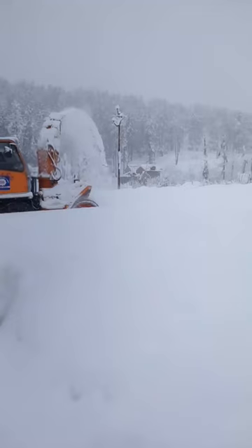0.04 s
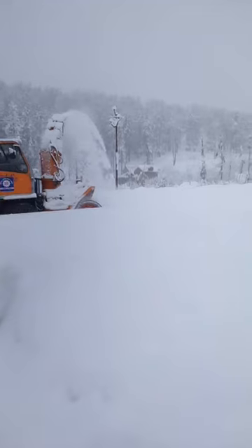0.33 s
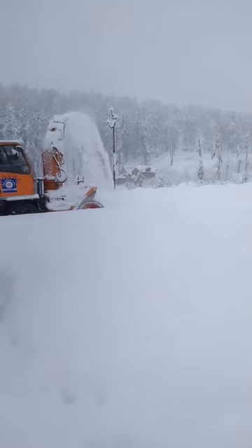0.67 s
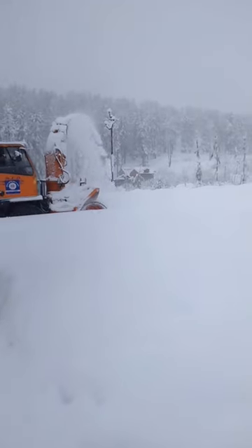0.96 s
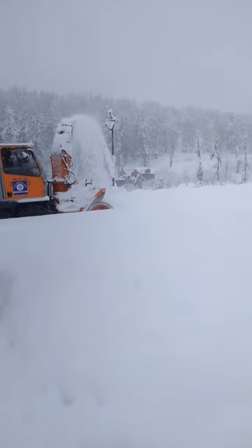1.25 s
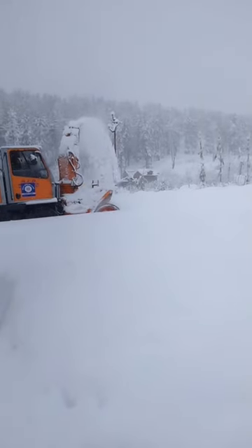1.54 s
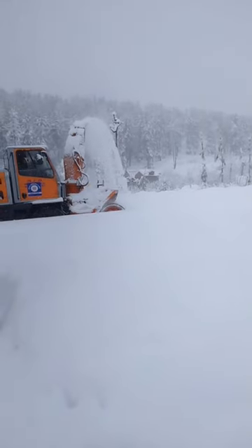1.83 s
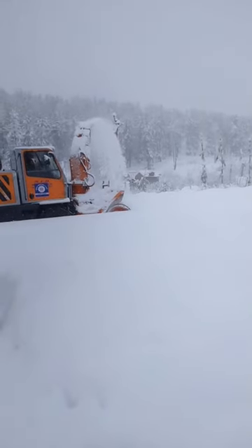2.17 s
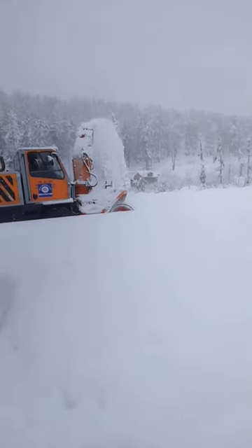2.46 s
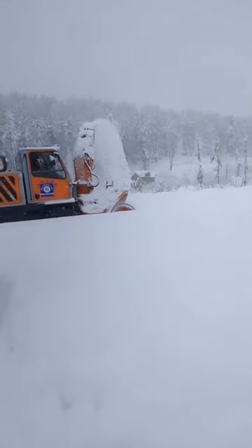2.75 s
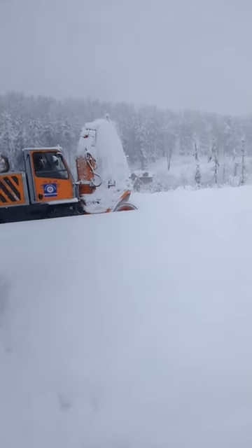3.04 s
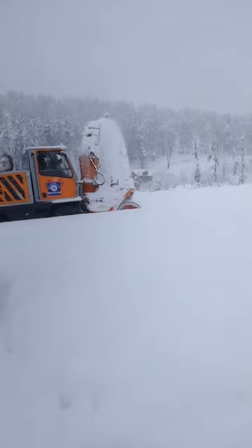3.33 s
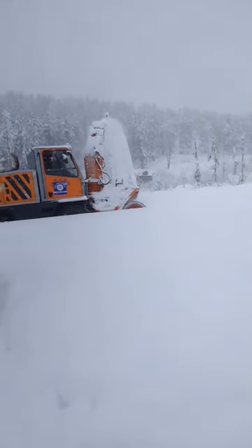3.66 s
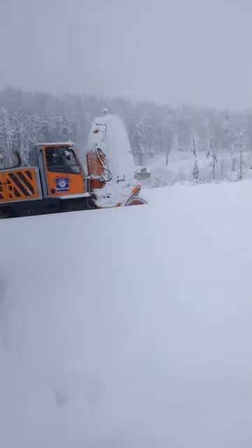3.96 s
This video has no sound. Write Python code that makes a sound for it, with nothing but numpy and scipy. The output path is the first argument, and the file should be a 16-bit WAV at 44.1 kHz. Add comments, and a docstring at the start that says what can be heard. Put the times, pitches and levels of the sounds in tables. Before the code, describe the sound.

Steady roar of a diesel snow blower, with gear whine, rattle and snow hiss.

```python
"""An open field, with a rotary snow blower working across it, its six-cylinder diesel at full speed.
The exhaust hums, the block knocks at each firing, and the drive gears whine and rattle as the load
comes and goes. The rotor roars, the casing drones and sheet-metal panels sing, while snow hisses
up the chute and out in a jet. One brief high fizz comes halfway through."""
import sys
import numpy as np
from scipy import signal
from scipy.fft import rfft, irfft
from scipy.io import wavfile
from scipy.ndimage import map_coordinates

SR = 44100
rng = np.random.default_rng(int(sys.argv[2]) if len(sys.argv) > 2 else 0)


def to_wav(sig):
    """Store sig (one row per channel, or 1-D mono) as 16-bit WAV at the path in sys.argv[1].

    Samples outside -1..1 are clipped; the rate is SR.
    """
    pcm = np.clip(np.atleast_2d(sig), -1, 1) * 32767
    pcm = np.round(pcm).astype(np.int16)
    wavfile.write(sys.argv[1], SR, pcm.T)  # frames by channels


N = 176400
T = np.arange(N) / SR
BIN_HZ = np.fft.rfftfreq(N, 1 / SR)
CYLINDERS = 6


def amp(db):
    """Decibels to gain."""
    return 10 ** (np.asarray(db) / 20)


def unit(x):
    """Scales to rms 1."""
    return x / np.sqrt(np.mean(x ** 2) + 1e-20)


def curve(points):
    """An automation lane: straight lines between (seconds, value) points."""
    return np.interp(T, *np.transpose(points))


def colour(x, spectrum):
    """Shapes a sound with an EQ curve of (Hz, dB) points, then scales it to rms 1."""
    hz, db = np.transpose(spectrum)
    eq_db = np.interp(np.log(BIN_HZ + 1), np.log(hz), db, left=-70, right=-70)
    return unit(irfft(rfft(x) * amp(eq_db), N))


def wander(rate_hz):
    """Random drift up to about the given rate, rms 1."""
    lowpass = (BIN_HZ > 0) / (1 + (BIN_HZ / rate_hz) ** 4)
    return unit(irfft(rfft(rng.standard_normal(N)) * lowpass, N))


def tone(turns):
    """A sine that follows a count of turns, rms 1."""
    return np.sqrt(2) * np.sin(2 * np.pi * (turns + rng.random()))


def clatter(cycles, pulse, repeat, size=3300):
    """Noise that swells at each firing; the share `repeat` comes back alike in every engine cycle."""
    one_cycle = irfft(np.exp(2j * np.pi * rng.random(size // 2 + 1)), size)
    loop = map_coordinates(one_cycle, [cycles % 1 * size], order=3, mode="grid-wrap")
    noise = np.sqrt(repeat) * unit(loop) + np.sqrt(1 - repeat) * rng.standard_normal(N)
    firings = cycles * CYLINDERS
    uneven = rng.standard_normal(CYLINDERS)  # some cylinders fire harder than others
    force = 1 + 0.18 * unit(uneven - uneven.mean())[firings.astype(int) % CYLINDERS]
    return noise * np.exp(pulse * force * (1 - np.cos(2 * np.pi * firings)))


# The engine's hum. Each row: harmonic of the two-turn engine cycle, level in dB.
EXHAUST_HARMONICS = [(6, -52.5), (12, -45), (18, -46.5), (21, -58), (22, -57), (24, -59.5), (30, -60.5),
                     (55, -55.5), (60, -56.5), (72, -57), (75, -51.5), (84, -49)]

def exhaust(cycles):
    """Exhaust and block hum in tones locked to the engine, each wavering in level."""
    return sum(amp(db) * tone(harmonic * cycles) * (1 + 0.12 * wander(5))
               for harmonic, db in EXHAUST_HARMONICS)


# The low end. Each row: pitch in Hz, level in dB.
ROTOR_AND_FAN = [(22.4, -72.5), (56, -67)]

def rotor_hum():
    """The slow-turning rotor and cooling fan lay down a faint, steady hum."""
    return sum(amp(db) * tone(hz * T) for hz, db in ROTOR_AND_FAN)


# The whine riding the load. Each row: time in seconds, level in dB before trim.
WHINE_LEVELS = [(0.1, -47), (0.3, -38), (0.45, -40), (0.7, -40.5), (0.81, -48), (0.97, -37.5), (1.1, -37.5),
                (1.15, -30), (1.45, -32.5), (1.6, -30), (1.83, -33), (2.22, -38), (2.32, -48),
                (2.45, -39.5), (2.62, -37), (2.73, -30.5), (3.06, -30.5), (3.13, -40.5), (3.18, -30),
                (3.4, -28), (3.5, -37), (3.57, -34), (3.62, -51)]

def gear_whine(cycles, teeth=92, trim_db=0.26):
    """Meshing teeth whine, with a wobble on each shaft turn and a random flutter."""
    shaft_turns = 2 * cycles
    wobble = 1 + 0.12 * tone(shaft_turns) + 0.1 * wander(30)
    return amp(curve(WHINE_LEVELS) + trim_db) * unit(wobble * tone(teeth * shaft_turns))


# The gear housing's ring. Each row: frequency in Hz, relative gain in dB.
HOUSING_EQ = [(1900, -47), (2060, -9), (2160, -0.5), (2300, -2.5), (2420, -4.5), (2500, -3.5), (2580, -22),
              (2800, -44)]
# How hard the teeth rattle. Each row: time in seconds, level in dB before trim.
RATTLE_LEVELS = [(0.12, -38), (0.43, -35), (0.52, -36.5), (1.66, -32), (2.55, -36), (2.71, -32.5),
                 (3.5, -34), (3.52, -35), (3.72, -35.5)]

def gear_rattle(cycles, trim_db=-1):
    """Gear teeth rattle with the firings and ring their housing."""
    rattle = colour(clatter(cycles, pulse=0.22, repeat=0.34), HOUSING_EQ)
    return amp(curve(RATTLE_LEVELS) + trim_db) * rattle


# The block's bright ring. Each row: frequency in Hz, relative gain in dB.
BLOCK_EQ = [(3500, -40.5), (3870, -12.5), (4090, 4), (4270, -3.5), (4500, -20), (4900, -39)]
# How hard it knocks. Each row: time in seconds, level in dB before trim and flicker.
KNOCK_LEVELS = [(0.09, -40), (0.11, -32), (0.16, -48), (0.55, -45), (0.575, -34.5), (0.62, -41), (0.8, -39),
                (0.93, -37), (1.05, -40), (1.37, -47.5), (1.75, -43.5), (2.3, -42.5), (3.1, -44.5),
                (3.72, -50)]

def knock(cycles, trim_db=-1.7):
    """Each firing rings the engine block."""
    flicker_db = 1.85 * wander(22)
    ring = colour(clatter(cycles, pulse=0.45, repeat=0.35), BLOCK_EQ)
    return amp(curve(KNOCK_LEVELS) + trim_db + flicker_db) * ring


# The body of the roar. Each row: frequency in Hz, relative gain in dB.
ROAR_EQ = [(20, -38), (45, -34.5), (90, -25), (130, -16), (185, -8.5), (235, -4), (285, -3.5), (340, -4),
           (395, -14), (440, -10), (495, -17), (555, -6.5), (615, -9.5), (680, -1.5), (745, -7.5),
           (810, -3.5), (890, -7), (990, -5.5), (1160, -8), (1205, -5.5), (1290, -12.5), (1345, -4),
           (1400, -11), (1800, -6.5), (1920, -9.5), (2650, -9.5), (2800, -15), (3070, -11), (3600, -16),
           (4100, -12.5), (4600, -19), (4950, -22), (5600, -32), (6350, -41), (9000, -58)]

def roar(cycles, level_db=-31.5):
    """Rotor and engine make a broad bed of noise that swells slightly."""
    swell_db = 0.43 * wander(12)
    return amp(level_db + swell_db) * colour(clatter(cycles, pulse=0.1, repeat=0.27), ROAR_EQ)


# The casing's midrange voice. Each row: frequency in Hz, relative gain in dB.
CASING_EQ = [(1350, -42.5), (1470, 0.5), (1530, -2), (1620, -0.5), (1720, 0), (1900, -33)]
# The drone's rise and fall. Each row: time in seconds, level in dB before trim.
DRONE_LEVELS = [(0.12, -47), (0.34, -41.5), (1.75, -40), (2.19, -33), (2.42, -40), (3.61, -37.5),
                (3.62, -46), (3.72, -40)]

def casing_drone(cycles, trim_db=-2):
    """The blower casing drones, much alike from one engine cycle to the next."""
    drone = colour(clatter(cycles, pulse=0.18, repeat=0.61), CASING_EQ)
    return amp(curve(DRONE_LEVELS) + trim_db) * drone


# Panel resonances. Each row: pitch in Hz, width in Hz, opening level in dB, closing level in dB.
PANEL_MODES = [(286, 8.8, -47, -54), (678.6, 16, -42.5, -49.5), (997, 6.5, -66, -43.5),
               (1214, 16, -47.5, -52), (1488, 6.2, -49.5, -49), (1636, 14, -56.5, -45)]

def panels():
    """Sheet-metal panels sing unsteadily, growing or fading as the machine moves past."""
    mix = np.zeros(N)
    for hz, width, first_db, last_db in PANEL_MODES:
        drift = wander(width) + 1j * wander(width)  # wavers in both level and phase
        ring = unit((drift * np.exp(2j * np.pi * hz * T)).real)
        mix += amp(np.linspace(first_db, last_db, N)) * ring
    return mix


# The chute's narrow hiss. Each row: frequency in Hz, relative gain in dB.
CHUTE_EQ = [(4400, -28), (4750, -4.5), (4980, 0), (5250, -6.5), (5600, -10.5), (6400, -25.5)]
# The strength of the slide. Each row: time in seconds, level in dB before trim.
SLIDE_LEVELS = [(0.12, -49.5), (0.55, -47), (0.85, -50.5), (2.67, -49.5), (3.39, -48.5), (3.47, -45),
                (3.71, -49), (3.72, -42.5)]

def snow_slide(cycles, trim_db=-1):
    """Snow hisses as it slides up the chute."""
    slide = colour(clatter(cycles, pulse=0.11, repeat=0.1), CHUTE_EQ)
    return amp(curve(SLIDE_LEVELS) + trim_db) * slide


# The airy top of thrown snow. Each row: frequency in Hz, relative gain in dB.
SPRAY_EQ = [(4000, -17), (6350, -10.5), (7000, -4.5), (7550, 0), (8300, -1.5), (9500, -9), (11000, -15.5),
            (12400, -15), (12900, -7.5), (13300, -18.5), (13900, -15), (14600, -9.5), (15400, -9)]
# The strength of the jet. Each row: time in seconds, level in dB before trim.
SPRAY_LEVELS = [(0.12, -56.5), (0.28, -56.5), (1.74, -56.5), (1.76, -55), (2.09, -56.5), (3.72, -54.5)]

def snow_spray(cycles, trim_db=1.6, grain_db=1.0):
    """Thrown snow leaves as a grainy, hissing jet."""
    grains = clatter(cycles, pulse=0.05, repeat=0) * amp(grain_db * wander(400))
    return amp(curve(SPRAY_LEVELS) + trim_db) * colour(grains, SPRAY_EQ)


# The sheen of the fizz. Each row: frequency in Hz, relative gain in dB.
FIZZ_EQ = [(8500, -31.5), (10300, 0), (11600, 0), (12600, -4), (15000, -15)]

def fizz(peak_s=1.865, width_s=0.045, peak_db=-58.5):
    """One brief puff of high noise swells and dies away."""
    swell = np.exp(-((T - peak_s) / width_s) ** 2)
    return amp(peak_db) * swell * colour(rng.standard_normal(N), FIZZ_EQ)


# The engine's nearly steady pace. Each row: time in seconds, firings per second.
FIRING_RATE = [(0.1, 77.77), (0.3, 77.79), (0.45, 77.64), (0.7, 77.68), (1.05, 77.68), (1.2, 77.87),
               (1.45, 77.98), (1.63, 77.85), (1.85, 77.93), (2.17, 77.78), (2.5, 78.23), (2.7, 77.93),
               (2.98, 78.36), (3.2, 78.42), (3.42, 78.54), (3.58, 78.33), (3.75, 78.61)]

def scene():
    """Mixes the layers in mono, with one engine speed clocking all that pulses with the firings."""
    cycles = np.cumsum(curve(FIRING_RATE)) / SR / CYLINDERS
    drive = exhaust(cycles) + rotor_hum() + gear_whine(cycles) + gear_rattle(cycles) + knock(cycles)
    body = roar(cycles) + casing_drone(cycles) + panels()
    snow = snow_slide(cycles) + snow_spray(cycles)
    return (drive + body + snow + fizz())[None]


def record(dry):
    """Quick fades top and tail the sound, and a steep low-pass takes off the highest treble."""
    start_s, fade_in_s, stop_s, fade_out_s = 0.085, 0.016, 3.757, 0.0075
    fade = np.clip((T - start_s) / fade_in_s, 0, 1) * np.clip((stop_s - T) / fade_out_s, 0, 1)
    lowpass = signal.firwin(801, cutoff=15560, window=("kaiser", 9), fs=SR)
    return signal.oaconvolve(dry * fade, lowpass[None], "same")


dry = scene()
out = record(dry)
to_wav(out)
```